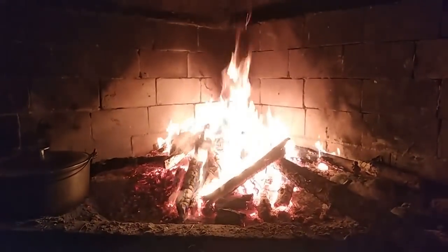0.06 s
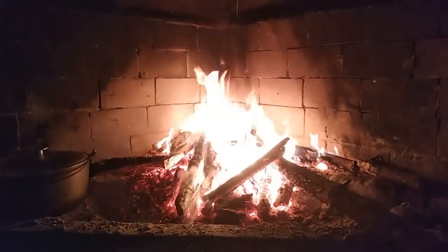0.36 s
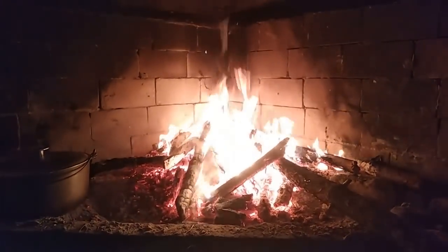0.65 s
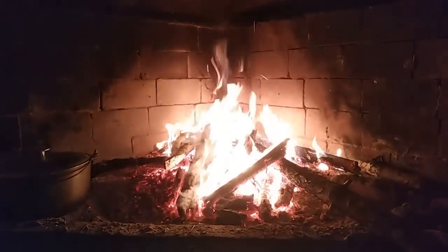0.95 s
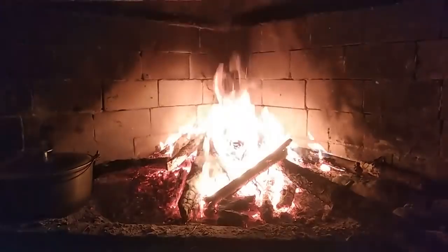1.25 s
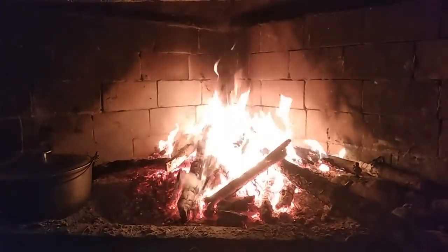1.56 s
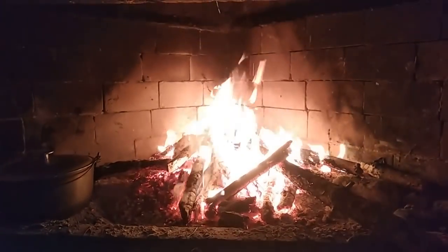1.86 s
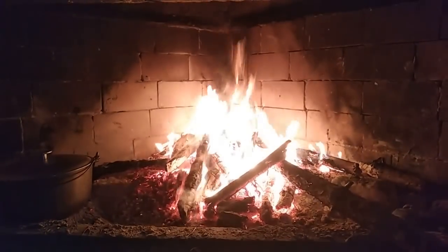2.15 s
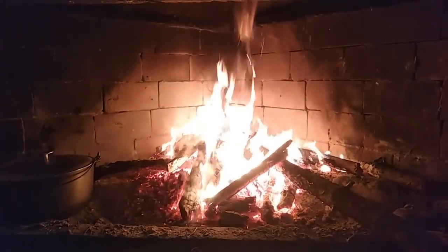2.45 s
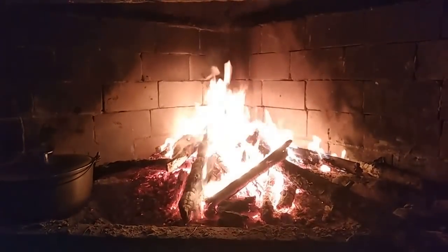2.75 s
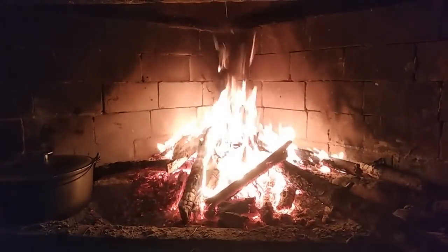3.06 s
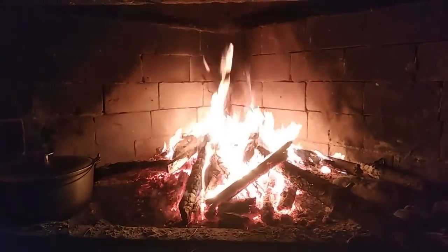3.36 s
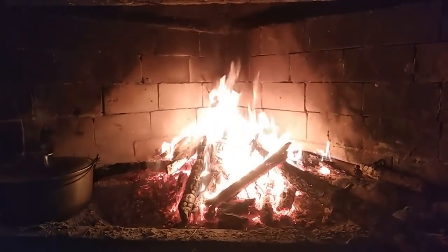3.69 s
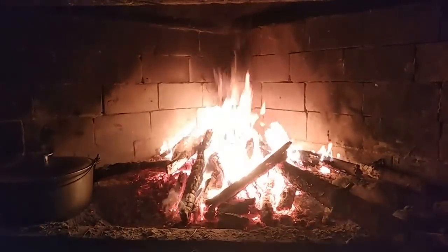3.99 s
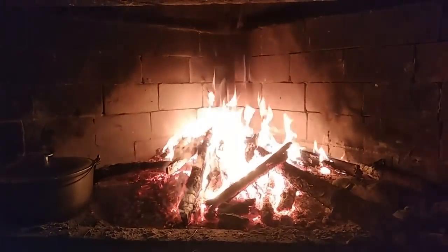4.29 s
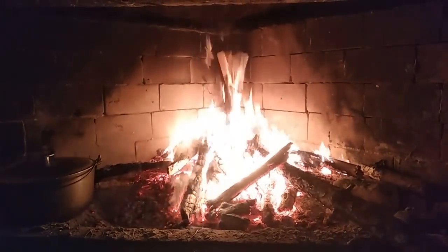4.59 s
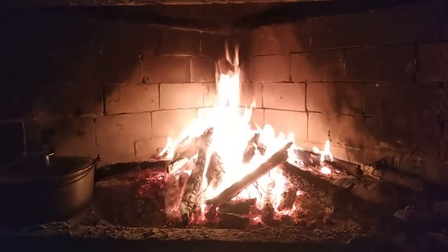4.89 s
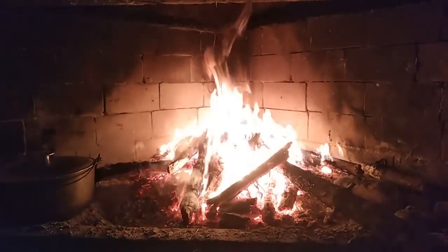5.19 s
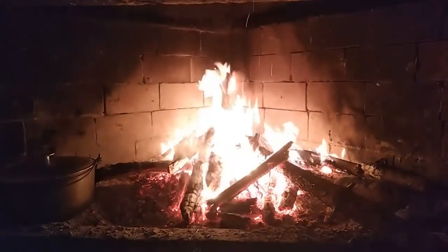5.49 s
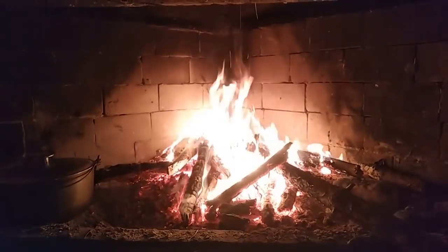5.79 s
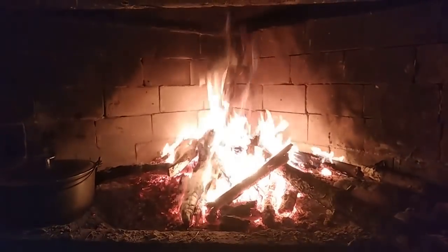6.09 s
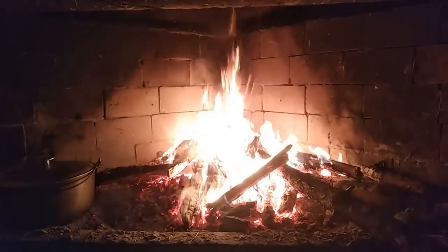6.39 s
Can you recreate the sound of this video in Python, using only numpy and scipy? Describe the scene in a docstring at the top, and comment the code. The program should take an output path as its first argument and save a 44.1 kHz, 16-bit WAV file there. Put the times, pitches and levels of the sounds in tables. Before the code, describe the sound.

Split logs burning in a brick fireplace, with sharp, irregular crackles and pops over a faint flame rumble in a quiet room.

```python
"""Split logs burn in a brick fireplace in a quiet room.
From the start the flames flutter low, the fire hisses and escaping gas hums now and then.
Gas pockets and wood fibres burst in bright snaps that rattle between the bricks and fade in the room,
and embers tick after them. Half a second in, a snap sets a piece of iron ringing briefly.
At about five seconds a flying ember taps the left microphone, and the fire crackles on."""
import sys
import numpy as np
from scipy import signal
from scipy.fft import rfft, irfft
from scipy.io import wavfile
from scipy.ndimage import uniform_filter1d

SR = 44100
rng = np.random.default_rng(int(sys.argv[2]) if len(sys.argv) > 2 else 0)


def pcm_store(signal):
    """Save signal as 16-bit PCM."""
    levels = np.round(np.clip(np.atleast_2d(signal), -1, 1) * 32767)
    wavfile.write(sys.argv[1], SR, levels.astype(np.int16).T)


N = 292824
TIME = np.arange(N) / SR

# Tone of the flames' rumble: f/Hz, relative level/dB
FLAME_SPECTRUM = [(25, -44), (38, -17), (54, 1.5), (75, -12.5), (110, -14), (160, -13.5), (250, -23),
                  (500, -31)]
# Puffs of gas catching fire: t/s, level/dB, half length/s
FLAME_PUFFS = [(.54, -56, 0.023), (0.653, -62.5, .025), (1.25, -59, 0.058), (1.5, -61, 0.014),
               (1.68, -58.5, .025), (1.798, -61, 0.035), (2.202, -53, .045), (2.461, -55.5, 0.041),
               (2.82, -65, .04), (3.68, -62, .04), (4.807, -59, 0.053), (6.346, -62, 0.013),
               (6.58, -61.5, 0.05)]
# Tone of the fire's hiss: f/Hz, relative level/dB
HISS_SPECTRUM = [(150, -12), (300, -10.5), (700, -17.5), (1500, -14), (3500, -13.5), (6000, -14.5),
                 (10000, -2.5), (16000, -13)]
# Gas escaping from cracks: t/s, f/Hz, level/dB, half length/s, width as a share of the pitch
GAS_ESCAPES = [(0.025, 844, -65, 0.059, 1), (0.07, 360, -65.5, 0.009, 0.45),
               (3.825, 288, -64.5, 0.047, 0.18), (4.366, 1870, -71, .022, 0.24),
               (5.648, 496, -73.5, 0.016, 0.25), (5.668, 189, -66, 0.048, 0.21),
               (5.723, 4000, -67.5, 0.041, .45)]
# Bursts in the wood: t/s, snap level/dB, knock against snap before its boost/dB,
# tearing time/ms, left over right/dB
WOOD_POPS = [(0.0276, -22, -31.5, 0.23, -0.5), (0.091, -32.5, -49, 2.9, 3.5), (0.1582, -33.5, -36, .6, 7),
             (0.2094, -26.5, -31, 0.6, 5.5), (0.4254, -44, -61, 1.7, 3), (0.4686, -26, -22, 0.35, 1.5),
             (.517, -38, -49, 0.81, 1), (.5521, -27, -21.5, 0.21, 4), (0.6773, -24, -41, 1.2, -2.5),
             (.733, -40.5, -30, 16, 4), (0.853, -30, -28.5, 3.5, 2), (1.0127, -23, -23.5, 0.32, 0),
             (1.121, -25, -40, 4.7, 5.5), (1.1486, -25.5, -23.5, 0.38, 0.5), (1.179, -24.5, -21.5, 0.23, 2),
             (1.256, -44.5, -54, .2, 3), (1.353, -25.5, -18, 0.92, 0.5), (1.4354, -28, -44.5, 4, 3.5),
             (1.5034, -22.5, -20.5, 0.82, 1.5), (1.5073, -19.5, -49, 0.11, 3), (1.6072, -34, -48, 0.088, 3),
             (1.6666, -36, -34, 9.4, 1.5), (1.7079, -35.5, -39.5, 0.52, 5), (1.7888, -25, -30.5, 1.5, 1.5),
             (1.8679, -48, -25.5, 0.22, 1), (2.04, -57.5, -38.5, 1.5, 7), (2.1017, -28.5, -50, 0.45, 6),
             (2.1168, -18, -22, 1, 9.5), (2.1228, -15, -26.5, 1.16, -1.5), (2.2803, -42, -72, 0.25, 2),
             (2.385, -33.5, -73, 4.3, 6), (2.439, -30, -31.5, 4.8, 7), (2.4917, -40, -35.5, 0.18, 2),
             (2.649, -39, -40.5, 0.37, 0), (2.676, -45, -57, 2.7, -1), (2.732, -39, -51, 0.39, 4),
             (2.744, -25, -27, 3.1, .5), (2.8717, -33.5, -49, 1.5, 2.5), (2.909, -36, -64, 2, 1),
             (2.947, -36, -37, 0.07, 6), (2.988, -54.5, -23, .7, 6.5), (3.057, -52, -56.5, 0.68, 17.5),
             (3.1077, -31, -26.5, 7, 2), (3.1171, -21.5, -31.5, 0.22, 5), (3.152, -22, -28, 0.26, 2.5),
             (3.157, -21, -28, 0.56, -0.5), (3.297, -37, -82, 0.84, 3), (3.3754, -38, -57, 1.2, 3.5),
             (3.444, -30.5, -38.5, 0.87, 0), (3.552, -27, -40.5, 0.48, 2), (3.5864, -23, -28.5, 1.6, 3.5),
             (3.651, -38.5, -40, 0.29, 1), (3.715, -25.5, -29, 0.99, 2.5), (3.764, -23.5, -34, 5.1, 4),
             (3.773, -23, -22.5, 2.3, 0), (3.829, -28.5, -25.5, 0.68, 0), (3.9404, -58, -11.5, .7, 12),
             (4.0654, -34.5, -36.5, 0.99, 3), (4.204, -26, -22, 0.65, 0), (4.2625, -42, -69, .2, 8),
             (4.528, -43.5, -22.5, 2.3, 5), (4.537, -27.5, -33, 1.1, 3), (4.5473, -24, -20, 0.65, 3),
             (4.6631, -33, -24, 0.4, 3), (4.8314, -50, -69, 2.6, 4), (4.941, -38, -68, 0.47, 9),
             (4.9598, -26.5, -29, 0.88, .5), (5.0261, -41.5, -48, 0.32, 5), (5.1139, -34.5, -59, .3, 7),
             (5.138, -34.5, -64, 1.4, 1), (5.1754, -16.5, -26, 0.46, -8), (5.225, -22, -21.5, 0.8, 0.5),
             (5.328, -32.5, -32.5, 0.14, 8), (5.3671, -25, -29, 0.18, 2.5), (5.463, -33, -37, 0.8, 4),
             (5.495, -31, -35, 7.8, 10.5), (5.5159, -22.5, -29, 1.2, 1.5), (5.661, -50.5, -62, .2, 5),
             (5.748, -40.5, -18, 1, 1.5), (5.9212, -42, -14, 1.1, 4), (5.9746, -13, -39, 0.33, 3.5),
             (6.009, -26.5, -23.5, 0.31, 5.5), (6.159, -27.5, -21.5, 0.66, 4), (6.199, -31.5, -54, 0.18, 6),
             (6.221, -42.5, -23, 0.62, 4), (6.276, -24, -26, .5, 4), (6.3529, -44.5, -22.5, 4.3, -12),
             (6.355, -27.5, -19.5, 0.09, 6), (6.4194, -43, -18.5, 0.52, 2.5), (6.5538, -28.5, -20, .3, 1.5),
             (6.615, -28, -37.5, 1.9, 1)]
# Tone of the room's echo: f/Hz, relative level/dB
ECHO_SPECTRUM = [(150, -2.5), (500, -0.5), (1200, 0), (2500, 6), (5000, 2.5), (9000, 1), (12000, -7.5),
                 (16000, 10)]
# How long the echo takes to fade by 60 dB: f/Hz, fade time/s
ECHO_FADE = [(150, 0.27), (1000, 0.15), (4000, 0.15), (8000, 0.26), (12000, 0.24), (16000, 0.11)]
# Ringing of each microphone's opening, left then right: f/Hz, width/Hz, level against direct sound/dB
MIC_OPENINGS = [(9540, 3700, -16), (5860, 1800, -4)]
# Tones of the iron: f/Hz, level/dB, time to fade by 60 dB/s
IRON_TONES = [(945, -60.5, 0.8), (1480, -65.5, 3.1)]

LEAD_MS = 1.0   # silence before each burst
POP_GAIN = np.sqrt(.012 * SR)   # makes pop and tick levels count as averages over 12 ms
SPLINTER_WIDTH_HZ = 3400   # a wide peak, so splinters ring only for an instant


def from_db(db):
    """Turn decibels into a number to multiply by."""
    return 10 ** (np.asarray(db) / 20)


def rms_one(x):
    """Scale a sound so that its average strength (rms) is 1."""
    return x / np.sqrt(np.mean(x ** 2) + 1e-20)


def unit_energy(x):
    """Scale a sound so that its total energy averages 1 per channel."""
    return rms_one(x) / np.sqrt(x.shape[-1])


def at_hz(points, hz):
    """Read between the rows of a table, with octaves evenly spaced."""
    freq, value = np.transpose(points)
    return np.interp(np.log(hz), np.log(freq), value)


def butter(x, hz, kind, order=2):
    """Keep the lows, the highs or a band; a higher order cuts more steeply."""
    return signal.sosfilt(signal.butter(order, np.minimum(hz, SR / 2 - 1), kind, fs=SR, output="sos"), x)


def resonate(x, hz, width_hz):
    """Let a sound ring around one pitch; a narrower peak rings longer."""
    r = np.exp(-np.pi * width_hz / SR)
    feedback = [1, -2 * r * np.cos(2 * np.pi * hz / SR), r * r]
    return signal.lfilter(np.array([1, 0, -1]) * (1 - r * r) / 2, feedback, x)


def panned(x, pan_db):
    """Make the left side pan_db louder than the right, at the same total power."""
    return x * rms_one(from_db([[pan_db / 2], [-pan_db / 2]]))


def add(out, x, s):
    """Mix x into out, starting at s seconds."""
    start = max(0, round(s * SR))
    out[:, start:start + x.shape[-1]] += x[:, :max(0, N - start)]


def noise(spectrum, channels=2):
    """Make steady noise of strength 1, with its tone shaped by a table."""
    hz = np.maximum(np.fft.rfftfreq(N, 1 / SR), 1)
    inside = (hz > spectrum[0][0] / 2) & (hz < spectrum[-1][0] * 2)
    white = rfft(rng.standard_normal((channels, N)))
    return rms_one(irfft(white * from_db(at_hz(spectrum, hz)) * inside, N))


def swell(s, half_s):
    """A smooth rise and fall that peaks at s seconds."""
    return np.exp(-((TIME - s) / half_s) ** 2)


def jitter(channels, size):
    """Random steps between -2 and 2, each about 0.2 ms long."""
    return np.repeat(np.clip(rng.standard_normal((channels, size // 8)), -2, 2), 8, axis=1)


def rumble(top_hz, apart_db=-17.5):
    """The deep noise of flames, nearly alike on both sides and evened out in level."""
    flame = noise(FLAME_SPECTRUM, channels=1) + from_db(apart_db) * noise(FLAME_SPECTRUM)
    deep = butter(flame, top_hz, "low", order=3)
    return deep / np.sqrt(uniform_filter1d(np.mean(deep ** 2, axis=0), size=2400))


def flames(steady_db=-72.5, flutter_db=3.0, flutter_per_s=12):
    """Flames flap with a rumble; now and then a puff of gas catches with a low swell."""
    flutter = np.interp(TIME * flutter_per_s, np.arange(1000), rng.standard_normal(1000))
    flapping = from_db(steady_db + flutter_db * flutter) * rumble(top_hz=1100)
    puffs = sum(from_db(db) * swell(s, half_s) for s, db, half_s in FLAME_PUFFS)
    return flapping + puffs * rumble(top_hz=108)


def ember_hiss(level_db=-70.5):
    """The embers hiss softly and steadily."""
    return from_db(level_db) * noise(HISS_SPECTRUM)


def gas_jets():
    """Gas leaving a crack hums or hisses briefly around one pitch."""
    out = np.zeros(N)
    for s, hz, db, half_s, width in GAS_ESCAPES:
        hum = resonate(resonate(rng.standard_normal(N), hz, hz * width), hz, hz * width)
        out += from_db(db) * rms_one(hum) * swell(s, half_s)
    return out


def fracture(tear_ms, size):
    """Wood gives way in tiny jerks that quickly die out, equally strong from bass to treble."""
    ms = np.arange(size) / SR * 1000 - LEAD_MS
    jerks = from_db(4 * jitter(1, size)[0])
    loudness = (ms >= 0) * jerks * np.exp(-np.abs(ms) / max(tear_ms, .1))
    spectrum = rfft(rng.standard_normal(size) * loudness)
    broad_shape = np.sqrt(uniform_filter1d(np.abs(spectrum) ** 2, size=40) + 1e-12)
    return unit_energy(irfft(spectrum / broad_shape))


def fireplace_burst(tear_ms, scatter_db=-1.0, scatter_fade_s=0.057, size=2048):
    """A fracture arrives directly, then off the hearth and back wall, and scatters off logs and bricks."""
    source = fracture(tear_ms, size)
    paths = np.zeros((2, size))
    hearth_s, back_wall_s = rng.uniform([.0005, .0035], [.0016, .0052])
    for delay_s, db in (0, 0), (hearth_s, -5), (back_wall_s, -9):
        arrivals = int(delay_s * SR) + rng.integers(0, 9, 2)   # one for each side
        paths[[0, 1], arrivals] += from_db(db)
    bounced = signal.fftconvolve(paths, source[None], axes=1)[:, :size]
    age = np.maximum(np.arange(size) / SR - LEAD_MS / 1000, 0)
    rattle = (age > 0) * from_db(2 * jitter(2, size) - 60 * age / scatter_fade_s)
    scatter = unit_energy(rng.standard_normal((2, size)) * rattle)
    buried_db = 5.8 * np.log10(np.clip(2 * tear_ms, .3, 2))   # slow tears lie deeper and scatter more
    return bounced + from_db(scatter_db + buried_db) * scatter


def pops(splinter_hz=9980, spread_octaves=0.24, knock_boost_db=4.5, deep_knock_db=-43, db_per_octave=18):
    """Each burst rings a splinter (snap), rings the wood (crack) and thumps the log beneath (knock)."""
    out = np.zeros((2, N))
    for s, snap_db, knock_db, tear_ms, pan_db in WOOD_POPS:
        burst = fireplace_burst(tear_ms)
        pitch_hz = splinter_hz * 2 ** (spread_octaves * (rng.random() - .5))   # splinters vary in size
        splinter = resonate(burst, pitch_hz, SPLINTER_WIDTH_HZ)
        snap = unit_energy(butter(splinter, (6450, 14800), "band", order=3))
        wood_ring = from_db(8) * resonate(burst, hz=rng.uniform(2960, 4630), width_hz=1100)
        crack = butter(burst + wood_ring, (2090, 6400), "band", order=3)
        crack = from_db(-3 + 0.4 * knock_db) * unit_energy(crack)   # grows with the knock
        # Harder knocks reach deeper into the bass.
        octaves_up = np.clip((deep_knock_db - snap_db - knock_db) / db_per_octave, 0, 1)
        knock = butter(butter(burst, 2000, "low"), 250 * 2 ** octaves_up, "high", order=4)
        knock = from_db(knock_db + knock_boost_db) * unit_energy(knock)
        pop = panned(snap + crack - knock, pan_db)
        add(out, pop * from_db(snap_db) * POP_GAIN, s - LEAD_MS / 1000)
    return out


def ember_ticks(idle_db=-56.5, idle_per_s=10, shaken_db=-19, fade_db=3.5, settle_s=0.032, per_pop=3):
    """Charcoal flakes split off at a few spots: at random, and after each pop, weaker as the log settles."""
    spots = []
    for hz in np.geomspace(8500, 12500, 8):
        flake = resonate(fireplace_burst(tear_ms=0.2, scatter_db=-6.5), hz, SPLINTER_WIDTH_HZ)
        spots.append(unit_energy(butter(flake, 4500, "high")))
    ticks = [(s + settle_s * wait, db + shaken_db - fade_db * wait)
             for s, db, *_ in WOOD_POPS for wait in rng.exponential(1, per_pop)]
    ticks += [(s, idle_db) for s in TIME[rng.random(N) < idle_per_s / SR]]
    out = np.zeros((2, N))
    for s, db in ticks:
        softer_db = rng.uniform(-11.5, 0)
        add(out, from_db(db + softer_db) * spots[rng.integers(len(spots))], s)
    return panned(POP_GAIN * out, pan_db=4.5)


def room_echo(x, level_db=-15.5, build_s=0.034, size=26000):
    """The room adds a soft wash of echoes, separate on each side, that dies soonest in the top treble."""
    age = np.arange(size) / SR
    tail = np.zeros((2, size))
    edges_hz = np.geomspace(140, 18000, 13)
    for low, high in zip(edges_hz, edges_hz[1:]):
        hz = np.sqrt(low * high)
        band = butter(rng.standard_normal((2, size)), [low, high], "band", order=3)
        tail += band * from_db(at_hz(ECHO_SPECTRUM, hz) - 60 * age / at_hz(ECHO_FADE, hz))
    tail = unit_energy(tail * (1 - np.exp(-age / build_s)))
    return from_db(level_db) * signal.fftconvolve(x, tail, axes=1)[:, :N]


def microphone_openings(x, level_db=-1.0):
    """The small opening of each microphone lifts the treble around a pitch of its own."""
    sides = [side + from_db(db) * resonate(side, hz, width)
             for side, (hz, width, db) in zip(x, MIC_OPENINGS)]
    return from_db(level_db) * np.array(sides)


def iron_ring(struck_s=.553, damped_s=0.69, die_away_s=0.01):
    """A struck piece of iron rings with two tones until it is damped."""
    age = np.maximum(TIME - struck_s, 0)
    ring = sum(from_db(db - 60 * age / fade_s) * np.sin(2 * np.pi * hz * age)
               for hz, db, fade_s in IRON_TONES)
    return ring * np.exp(-np.maximum(TIME - damped_s, 0) / die_away_s)


def microphone_tap(tap_s=5.1761, level_db=-6.0, rise_s=0.000073, fall_s=0.0073, bass_cut_hz=50):
    """An ember gives the left microphone a sudden push; its bass cut makes that swing a few times."""
    age = np.maximum(TIME - tap_s, 0)
    push = np.exp(-age / rise_s) - np.exp(-age / fall_s)
    sides_db = np.array([[0], [-16]])   # left, right
    return from_db(level_db + sides_db) * butter(push + 1e-18, bass_cut_hz, "high", order=5)


def scene():
    """Lay the crackle and its echo over the rumble and hiss of the fire, then add the tap."""
    crackle = pops() + ember_ticks() + iron_ring() + gas_jets()
    in_room = crackle + room_echo(crackle)
    return microphone_openings(in_room) + flames() + ember_hiss() + microphone_tap()


def record(dry, ceiling=.6, cutoff_hz=16200):
    """Round off the strongest peaks and steeply cut the highest treble."""
    rounded = ceiling * np.tanh(dry / ceiling)
    return signal.sosfilt(signal.ellip(10, .2, 90, cutoff_hz, fs=SR, output="sos"), rounded)


dry = scene()
out = record(dry)
pcm_store(out)
```